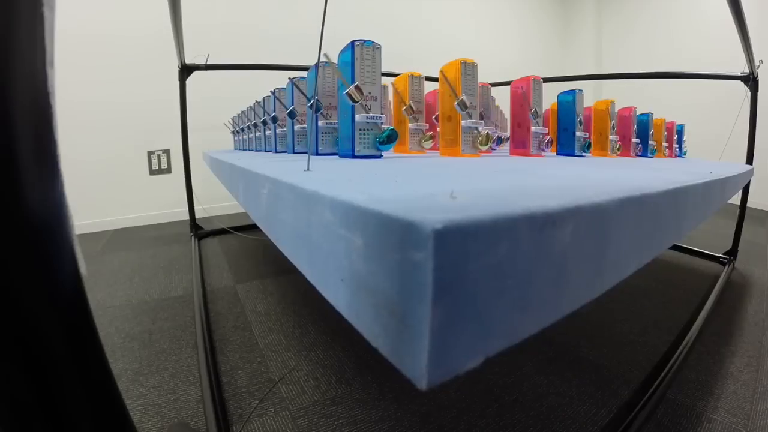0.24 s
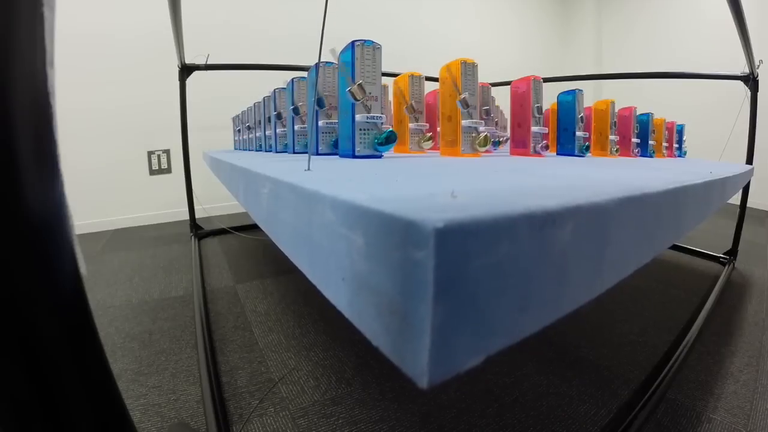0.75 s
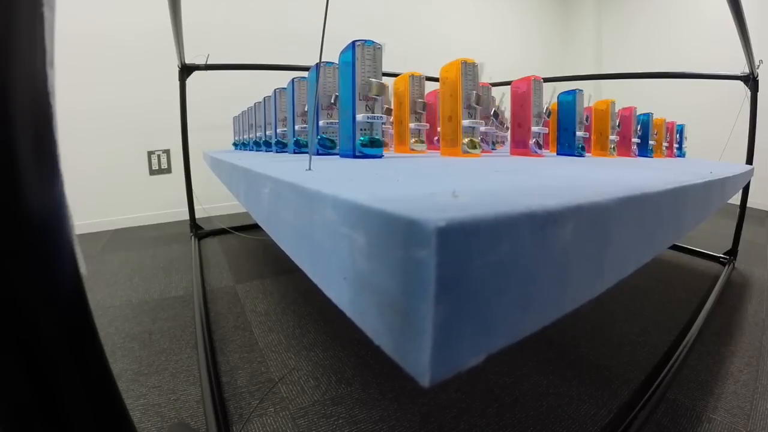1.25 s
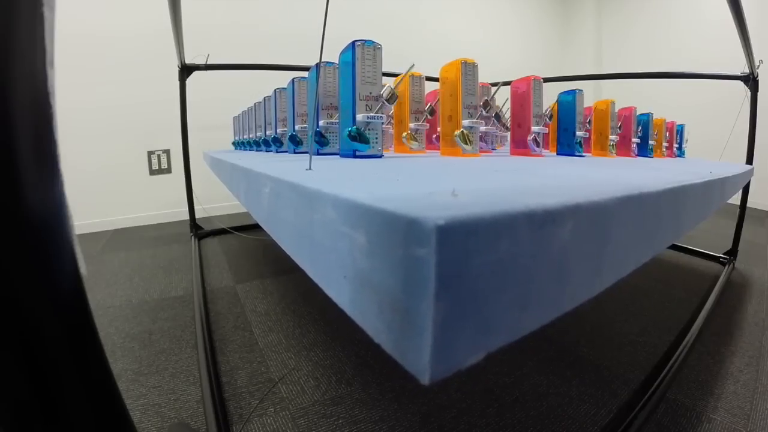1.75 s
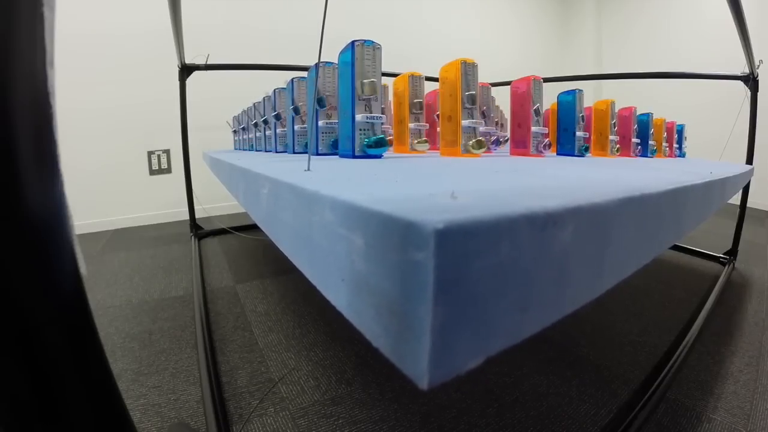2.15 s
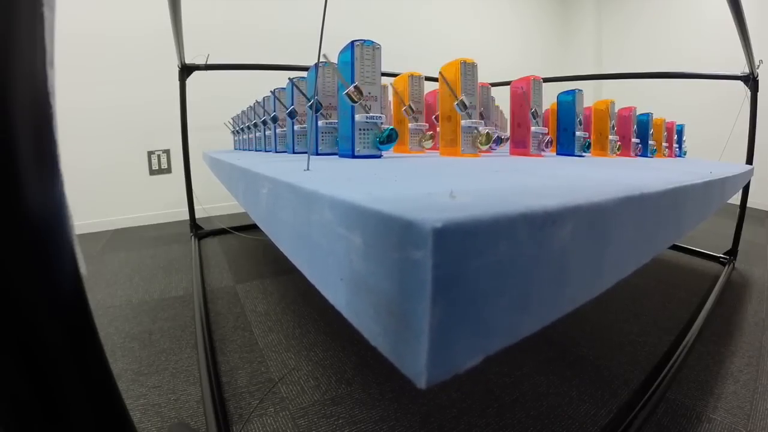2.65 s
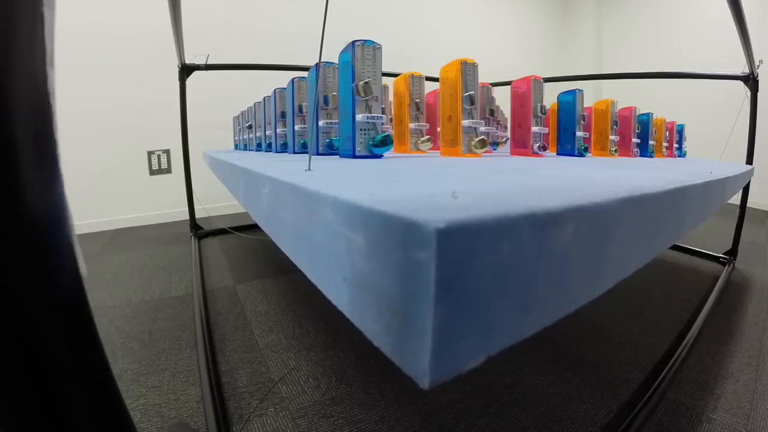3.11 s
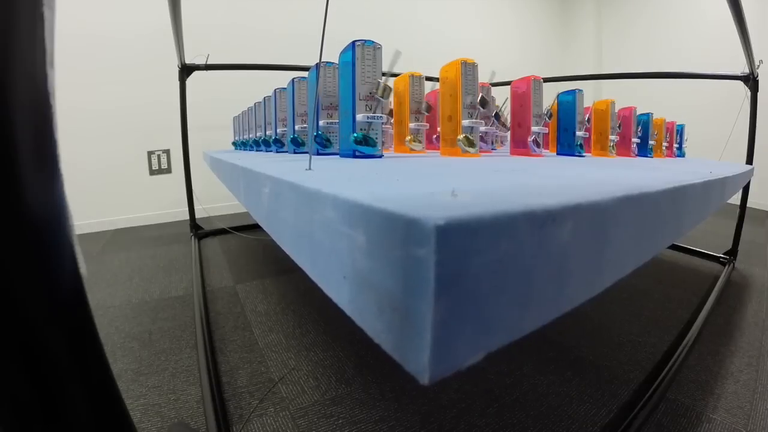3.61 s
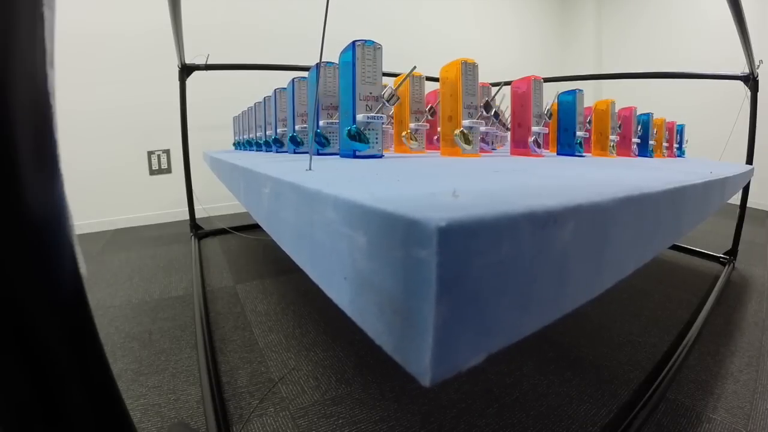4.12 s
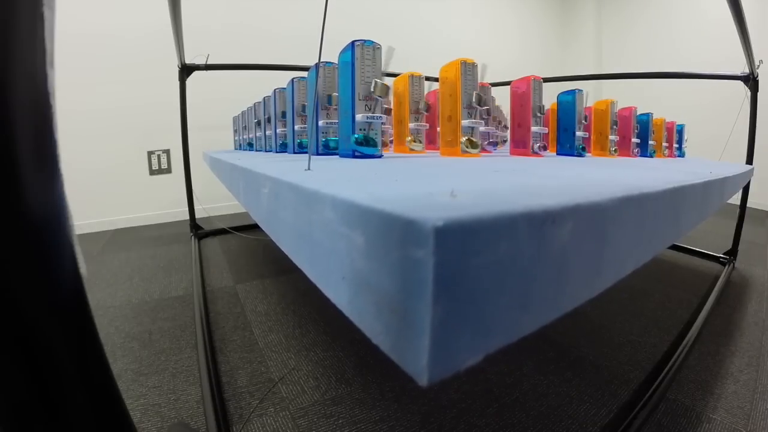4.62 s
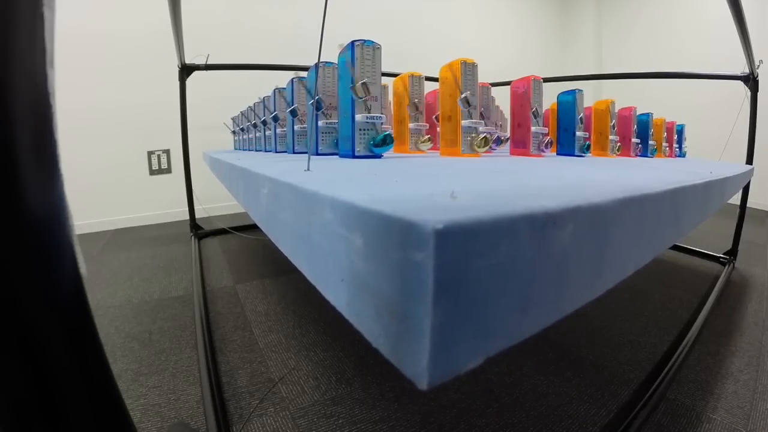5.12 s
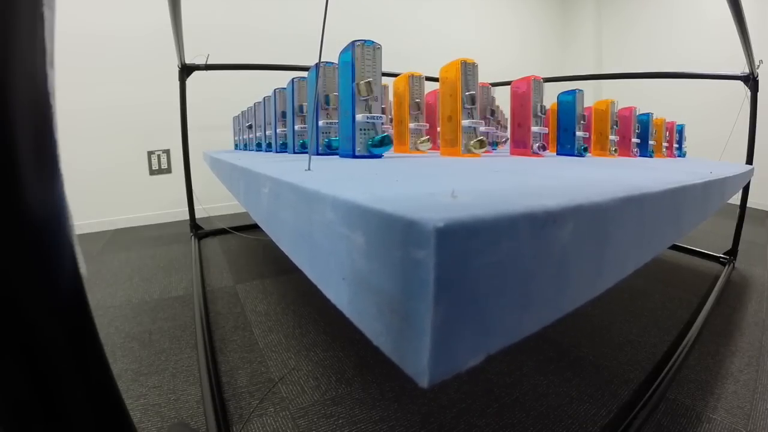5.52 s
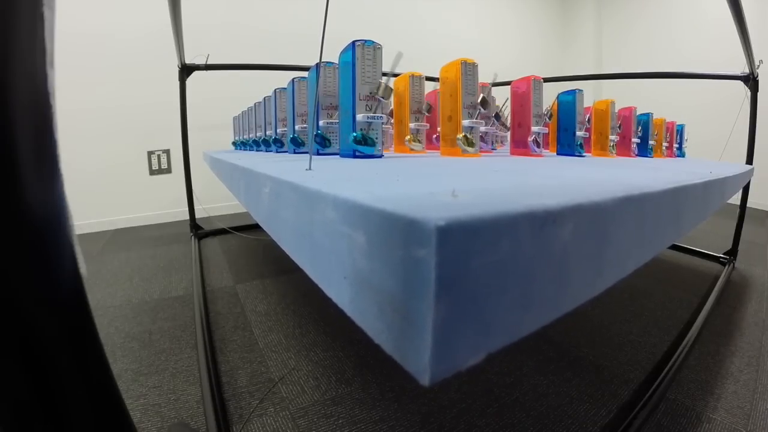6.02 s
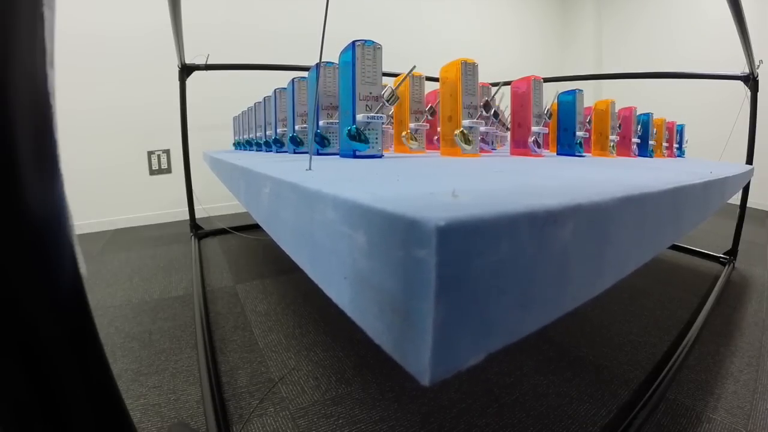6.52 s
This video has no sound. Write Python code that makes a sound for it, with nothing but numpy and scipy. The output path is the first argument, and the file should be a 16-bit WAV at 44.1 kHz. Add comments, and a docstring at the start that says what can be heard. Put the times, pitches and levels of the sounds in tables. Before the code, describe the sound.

A crowd of wind-up metronomes clacks together about 200 times a minute, every beat a brief crackling burst with short room echo.

```python
"""Dozens of plastic pendulum metronomes on a hanging platform tick in step, about 200 beats a minute, in a small room.
Each keeps its own place in the beat and its own tick and tock, so a beat is a rattle of clicks some 140 ms long that
nearly repeats every second time. A click is a filtered noise snap plus decaying sines for the hollow plastic case,
most of them pitched near 1.85 kHz. Shaped noise gives the short room tail and the low ventilation rumble;
a steady sine is the hum of its fan, and one soft low thud comes from the building."""
import sys
import numpy as np
from scipy import signal
from scipy.fft import rfft, irfft, next_fast_len
from scipy.io import wavfile
from scipy.ndimage import uniform_filter1d, minimum_filter1d

SR = 44100
rng = np.random.default_rng(int(sys.argv[2]) if len(sys.argv) > 2 else 0)


def log_audio(samples):
    """Write samples as a 16-bit WAV file to the path given in sys.argv[1]."""
    # one column per channel
    frames = np.atleast_2d(samples).T
    # limit to full scale, then quantise
    limited = np.clip(frames, -1, 1)
    pcm = np.round(limited * 32767).astype(np.int16)
    wavfile.write(sys.argv[1], SR, pcm)


N = 297675

# Levels in the tables are relative, ahead of the mix gains in scene().
# metronomes heard singly as the beat opens and closes:
# tock_lag_s [s], tick_lag_s [s], tock_level_db [dB], tick_level_db [dB], case_pitch_hz [Hz], case_ring_db [dB]
SINGLE_METRONOMES = [(0, 0, -8, -1, 1590, .5), (.0055, .007, -1.5, 3, 1640, -8),
                     (.012, .0155, 2, 2, 1560, -7), (.0175, .02, 1, 0, 1860, 1),
                     (.1295, .1305, 2.5, -1.5, 1840, -4)]
# how the crowd spreads through the beat: crowd_share [0-1], lag_s [s]
CROWD_SPREAD_IN_BEAT = [(0, .010), (.15, .042), (.5, .073), (.85, .104), (1, .136)]
# tone of the escapement's snap through the case: frequency_hz [Hz], level_db [dB]
SNAP_TONE = [(45, -56), (110, -39), (220, -18), (520, -5.5), (780, -5.5), (1050, -12), (1500, -2.5),
             (2400, 2.5), (2850, 4.5), (4800, 1), (6700, 1.5), (7600, -5), (8500, -1), (10000, -9.5),
             (15500, -26)]
# resonances of the hollow case: pitch_ratio [times the case pitch], level_db [dB], t60_s [s]
CASE_MODES = [(1.002, 7, 0.038), (1.5, -36, 0.0067), (4.552, -11.5, 0.09)]
# diffuse room tail by band: centre_hz [Hz], level_db [dB], t60_s [s]
ROOM_BANDS = [(118, 7, 1), (234, 1, 0.82), (575, -1, 0.52), (1210, -3.5, 0.38), (1650, -16, 0.42),
              (1833, -0.5, 0.33), (2290, -5, 0.3), (6100, -14, 0.32), (13800, -7.5, 0.15)]
# low resonances of the room: pitch_hz [Hz], width_hz [Hz], level_db [dB]
ROOM_RESONANCES = [(162, 8.2, -7), (235.6, 23, 5.5), (309, 11, -1.5), (524, 55, -3)]
# tone of the difference between the two microphone ports: frequency_hz [Hz], side_gain_db [dB]
SIDE_TONE = [(60, -28), (250, -17), (600, -13), (1100, -4), (1500, -10), (2000, -5.5), (3400, -8),
             (4300, -15.5), (8000, -7.5), (14000, -20)]
# spectrum shape of the ventilation noise: frequency_hz [Hz], density_db [dB per Hz]
VENTILATION_TONE = [(20, -16), (42, -7), (57, 2), (80, 4), (170, 11.5), (260, 4), (500, 9), (1000, -21),
                    (3000, -3), (8000, -14.5), (15000, -18.5)]
# hum of the ventilation fan: pitch_hz [Hz], level_db [dB]
FAN_HUM = (56, -64.5)
# soft low thud in the building: centre_s [s], pitch_hz [Hz], level_db [dB], half_length_s [s]
BUILDING_THUD = (3.245, 88, -46, .08)

# the common beat: first tick, one full swing there and back, and the tock a little short of half way
FIRST_TICK_S, SWING_S, TOCK_AFTER_S = -.0841, .60205, .2974
# the earliest metronome runs a little ahead, so the other single ones and the front rows fall behind it
SLIP_S_PER_S = .0005
# the front rows fill the middle of the beat, each in its own slot, the later ones softer
FRONT_FIRST_S, FRONT_LAST_S = .029, .117
FRONT_DB, FRONT_FADE_DB_PER_S, FRONT_RING_DB = 1, -43.5, -4
# their cases come in two pitches, about a third of them low; the spread is a fraction of the pitch
LOW_CASE_HZ, HIGH_CASE_HZ, FRONT_SPREAD = 1600, 1848, .021
# the crowd: click level, mean case pitch, and pitch spread as a fraction
CROWD_DB, CROWD_HZ, CROWD_SPREAD = -5.5, 1869.5, .026
# direct sound of the off-centre single metronomes in the side signal, before its tone shaping
ASIDE_DB = -6.5
VENTILATION_DB = -51.5
TOP_HZ = 15600  # treble cutoff


def undb(db):
    """Decibels to gain."""
    return 10 ** (np.asarray(db) / 20)


def unit(x):
    """Scale to an energy of one."""
    return x / np.sqrt(np.sum(x ** 2, axis=-1, keepdims=True))


def log_bins(size):
    """Log frequency of each bin of a transform, shifted by 1 Hz to avoid the log of zero."""
    return np.log(np.arange(size // 2 + 1) * SR / size + 1)


def gains(points, size):
    """Gain of a (Hz, dB) outline at each bin of a transform."""
    hz, db = np.transpose(points)
    return undb(np.interp(log_bins(size), np.log(hz), db))


def colour(x, points, size=2048):
    """Causal minimum-phase filter that follows a (Hz, dB) outline."""
    cepstrum = irfft(np.log(gains(points, size)))
    # folding the cepstrum onto positive time puts the energy as early as possible
    cepstrum[1:size // 2] *= 2
    cepstrum[size // 2 + 1:] = 0
    impulse = irfft(np.exp(rfft(cepstrum)))
    return signal.fftconvolve(x, impulse)[:len(x)]


def fade(t, t60):
    """Free decay, 60 dB in t60 seconds."""
    return np.exp(-np.log(1000) * t / t60)


def add(track, s, sound):
    """Mix a sound into a track from time s on; one that would start before the track is left out."""
    start = int(round(s * SR))
    part = sound[:max(len(track) - start, 0)]
    if start >= 0:
        track[start:start + len(part)] += part


def beat_times(tick):
    """Start of every tick, or of every tock a little under half a swing later."""
    first = FIRST_TICK_S + (0 if tick else TOCK_AFTER_S)
    return np.arange(first, N / SR, SWING_S)


def snap(t, rattle_db=-16, rattle_t60=0.18):
    """The escapement strikes: a crack spreads through the case, then a short rattle of the many plastic modes."""
    rise_s = .0007
    crack = fade(t, .017)
    rattle = undb(rattle_db) * fade(t, rattle_t60)
    envelope = (1 - np.exp(-(t / rise_s) ** 2)) * (crack + rattle)
    return unit(colour(rng.standard_normal(len(t)) * envelope, SNAP_TONE))


def ring(t, case_hz):
    """The hollow case rings in a few modes; so small a box radiates by its velocity and gives no bass."""
    motion = np.zeros(len(t))
    for ratio, db, t60 in CASE_MODES:
        mode = fade(t, t60) * np.sin(2 * np.pi * ratio * case_hz * t)
        motion += undb(db) / ratio * mode
    velocity = np.diff(motion, prepend=0)
    return unit(velocity)


def swings(beats, lag, drift, db, case_hz, ring_db, wander, fresh=0.65, scatter_db=1.5, size=3000):
    """One side of a metronome's swing: a lasting voice plus some fresh snap, slowly slipping in the beat."""
    t = np.arange(size) / SR
    voice = snap(t) + undb(ring_db) * ring(t, case_hz)
    slip = np.cumsum(rng.standard_normal(len(beats)))  # a random walk, wander seconds a step
    for s, late in zip(beats, wander * (slip - slip.mean())):
        gain = undb(db + scatter_db * rng.standard_normal())
        yield s + lag + drift * s + late, gain * (voice + fresh * snap(t))


def front_rows(stray_s=.0015, count=17):
    """Metronomes spaced about evenly through the middle of the beat, with the columns of SINGLE_METRONOMES."""
    rows = []
    for k, slot in enumerate(np.linspace(FRONT_FIRST_S, FRONT_LAST_S, count)):
        tock, tick, detune = rng.standard_normal(3)
        db = FRONT_DB + FRONT_FADE_DB_PER_S * (slot - FRONT_FIRST_S)
        case_hz = HIGH_CASE_HZ if k % 3 else LOW_CASE_HZ
        case_hz *= 1 + FRONT_SPREAD * detune
        rows.append((slot + stray_s * tock, slot + stray_s * tick, db, db, case_hz, FRONT_RING_DB))
    return rows


def metronomes(lead, near_wander=.0006, crowd_wander=.0016, crowd_ring_db=-3, count=32, channels=8):
    """Direct sound, begun lead seconds early: near and crowd by platform patch, and the off-centre clicks."""
    near, crowd = np.zeros((2, channels, N + int(lead * SR)))
    aside = np.zeros(near.shape[1])
    pitches = CROWD_HZ * (1 + CROWD_SPREAD * rng.standard_normal(count))
    closest = list(SINGLE_METRONOMES) + front_rows()
    for side in range(2):
        beats = beat_times(side)  # first all the tocks, then all the ticks
        for k, (tock, tick, tock_db, tick_db, hz, ring_db) in enumerate(closest):
            lag, db = (tock, tick)[side], (tock_db, tick_db)[side]
            follows = k > 0  # the earliest metronome marks the beat; the others slip against it
            drift, wander = SLIP_S_PER_S * follows, near_wander * follows
            for s, click in swings(beats, lag, drift, db, hz, ring_db, wander):
                add(near[k % channels], s + lead, click)
                if k < len(SINGLE_METRONOMES):
                    add(aside, s + lead, (-1) ** k * click)  # opposite sides in turn
        places = (np.arange(count) + rng.random(count)) / count
        lags = np.interp(places, *np.transpose(CROWD_SPREAD_IN_BEAT))
        for k, lag in enumerate(lags):
            for s, click in swings(beats, lag, 0, CROWD_DB, pitches[k], crowd_ring_db, crowd_wander):
                add(crowd[k % channels], s + lead, click)
    return near, crowd, aside


def room(x, gap=0.002, build=0.0016, size=32768):
    """Diffuse reflections build up after a gap in seconds; carpet and walls swallow the treble first."""
    t = np.arange(size) / SR
    hz, db, t60 = np.transpose(ROOM_BANDS)
    noise = rfft(rng.standard_normal(size))
    onset = 1 - np.exp(-np.maximum(t - gap, 0) / build)
    tail = np.zeros(size)
    for level, decay, band in zip(db, t60, np.eye(len(hz))):
        # each band is a triangle over log frequency that meets its neighbours
        band_noise = irfft(noise * np.interp(log_bins(size), np.log(hz), band))
        tail += undb(level) * unit(onset * fade(t, decay)) * band_noise
    return signal.fftconvolve(x, tail)[:len(x)]


def boom(x):
    """A few low resonances stand out of the reflections."""
    total = np.zeros(len(x))
    for hz, width, db in ROOM_RESONANCES:
        b, a = signal.iirpeak(hz, hz / width, fs=SR)
        total += undb(db) * signal.lfilter(b, a, x)
    return total


def ventilation():
    """Steady rumble of moving air, as noise shaped by its spectrum."""
    air = irfft(rfft(rng.standard_normal(N)) * gains(VENTILATION_TONE, N), N)
    return undb(VENTILATION_DB) * air / air.std()


def fan_hum(t):
    """The ventilation fan hums on one steady low sine."""
    hz, db = FAN_HUM
    return undb(db) * np.sin(2 * np.pi * hz * t)


def building_thud(t):
    """A soft low thud: a sine that swells and dies in a bell-shaped envelope."""
    s, hz, db, length = BUILDING_THUD
    return undb(db) * np.exp(-((t - s) / length) ** 2) * np.sin(2 * np.pi * hz * t)


def background():
    """Ventilation, the hum of its fan and one soft thud."""
    t = np.arange(N) / SR
    return ventilation() + fan_hum(t) + building_thud(t)


def scene(level_db=5, crowd_wet_db=2, sideways_db=-1):
    """Each platform patch has its own room paths; sideways reflections and off-centre clicks widen the stereo."""
    near, crowd, aside = metronomes(lead=.5)  # the early start lets the first tail already sound
    sent = near + undb(crowd_wet_db) * crowd
    tail = sum(room(patch) for patch in sent)
    sideways = undb(sideways_db) * sum(room(patch, gap=0, build=0.000068) for patch in sent)
    # a tiny lag between the ports leaves a difference that is a quarter turn out of phase
    quarter_turn = signal.hilbert(aside, next_fast_len(len(aside))).imag[:len(aside)]
    across = undb(ASIDE_DB) * quarter_turn
    direct = (near + crowd).sum(axis=0)
    mid = undb(level_db) * (direct + tail + boom(tail))[-N:] + background()
    side = undb(level_db) * (sideways + across)[-N:] + ventilation()
    side = colour(side, SIDE_TONE)
    return np.array([mid + side, mid - side])


def record(dry, size=130):
    """A quick limiter, linked across both channels, eases the highest peaks; a steep filter cuts the top."""
    knee, slope = .6, .55  # peak amplitude where limiting begins; share of the excess in dB taken off
    peak = np.abs(dry).max(axis=0) + 1e-9
    wanted = np.minimum(1, knee / peak) ** slope
    gain = uniform_filter1d(minimum_filter1d(wanted, size), size)  # size in samples
    top_cut = signal.ellip(10, .2, 80, TOP_HZ, fs=SR, output="sos")
    return signal.sosfilt(top_cut, gain * dry)


dry = scene()
out = record(dry)
log_audio(out)
```